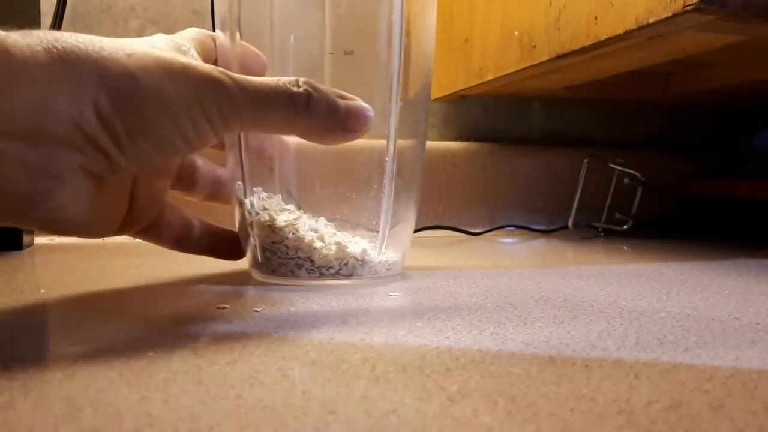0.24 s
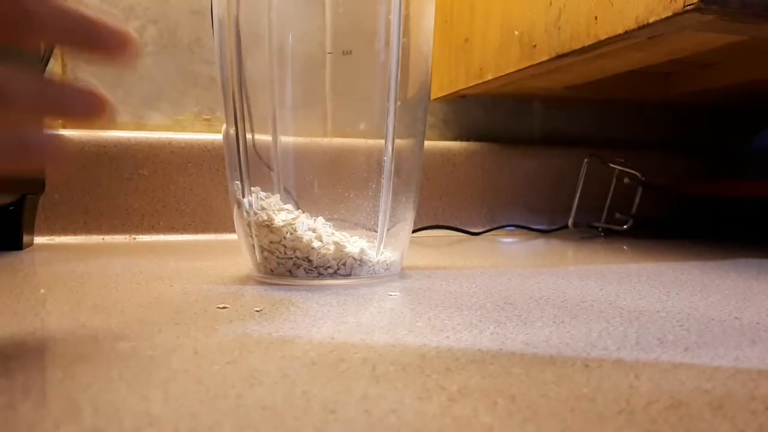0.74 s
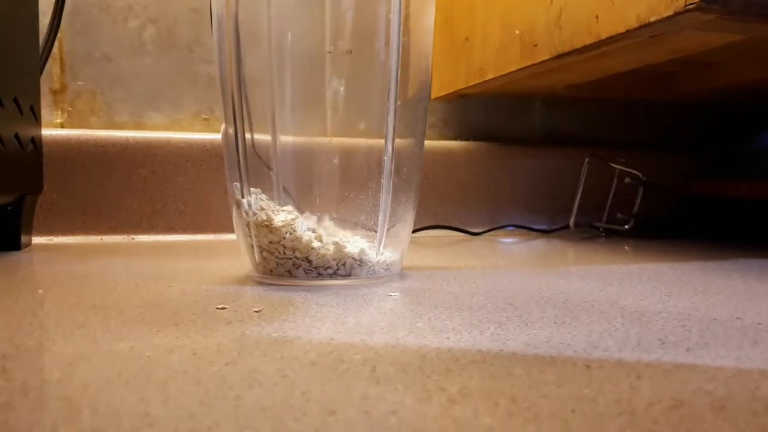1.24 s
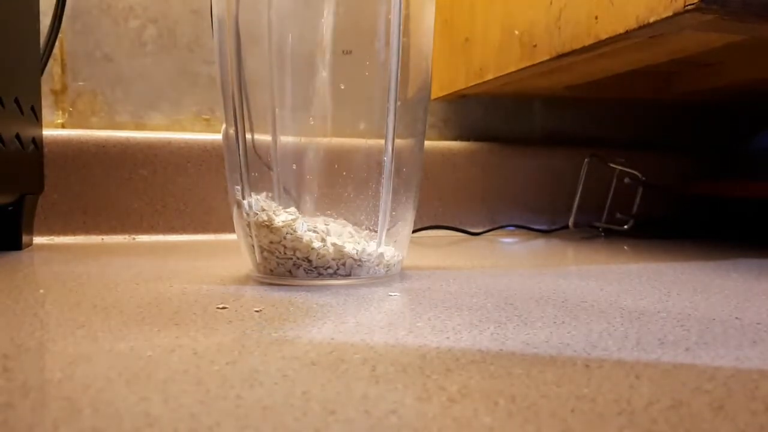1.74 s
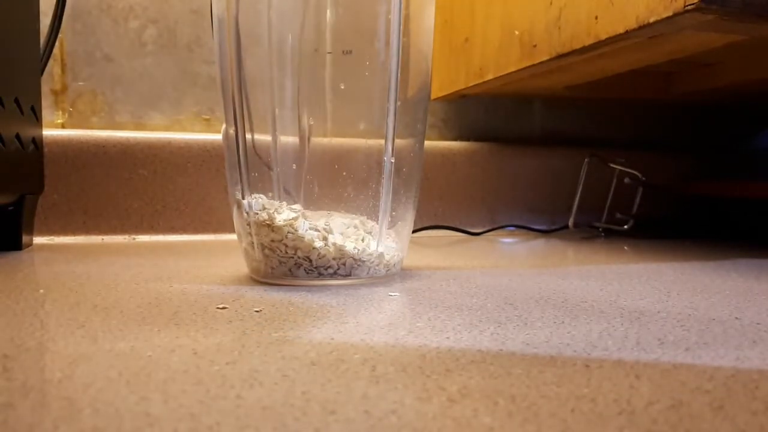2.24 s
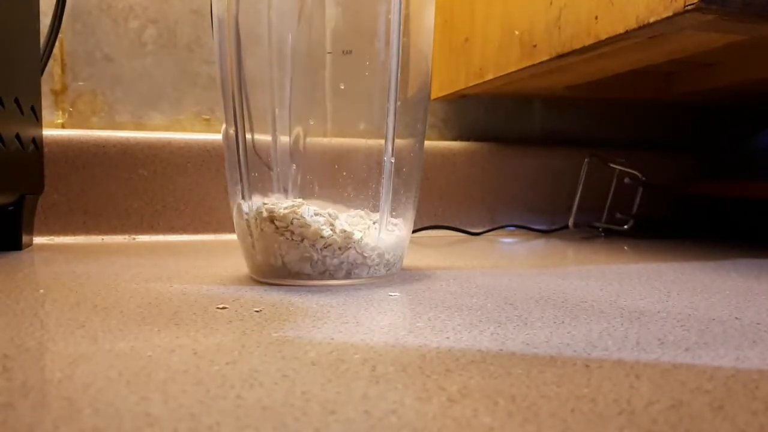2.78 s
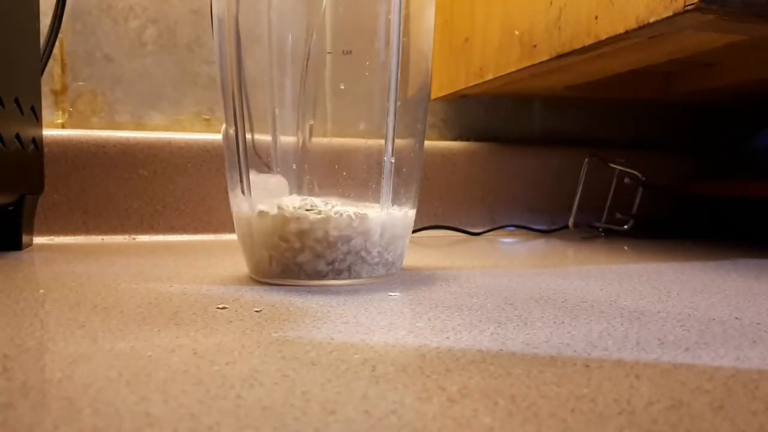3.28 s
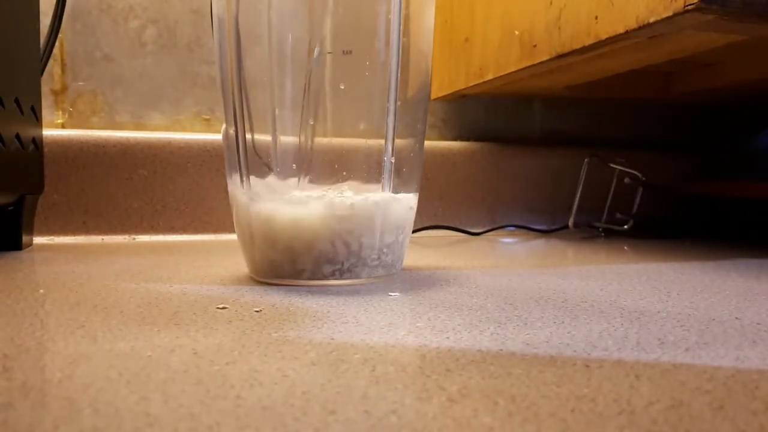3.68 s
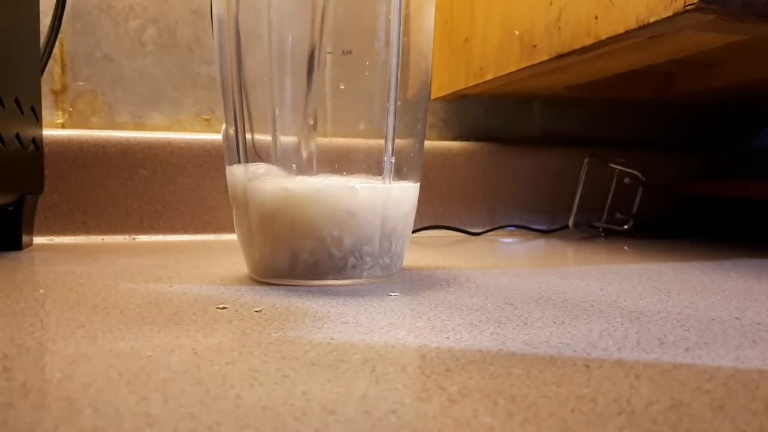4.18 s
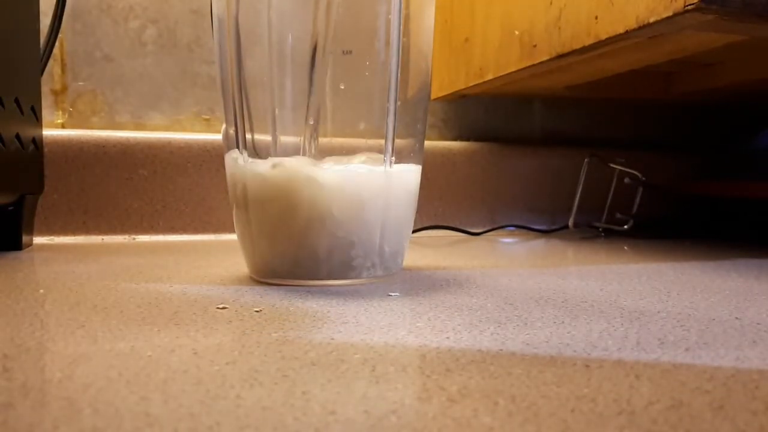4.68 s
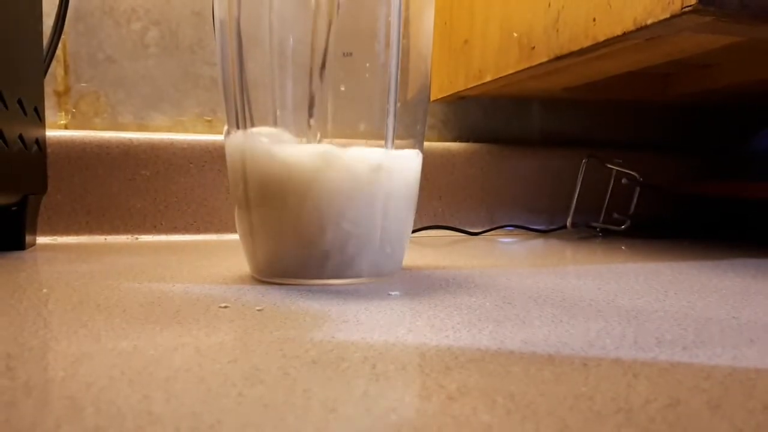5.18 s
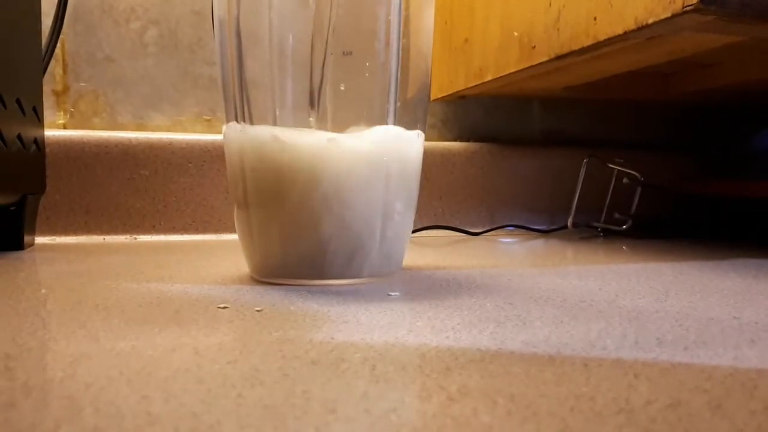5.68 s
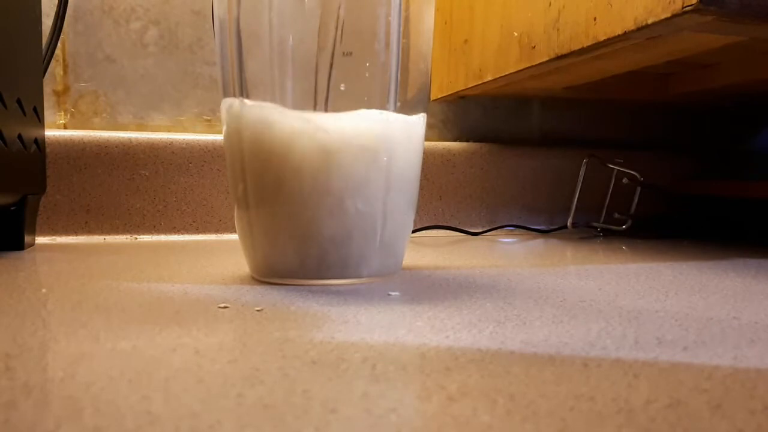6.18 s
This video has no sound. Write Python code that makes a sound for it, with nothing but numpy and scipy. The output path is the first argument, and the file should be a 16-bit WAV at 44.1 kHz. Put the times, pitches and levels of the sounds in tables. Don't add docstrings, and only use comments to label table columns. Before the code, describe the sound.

A short knock and a softer shuffle as a hand settles a plastic cup on a counter, then a quiet gap with faint refrigerator hum. Water spatters onto dry oats, quickly swelling into hollow, resonant glugs and wet slaps against the wall. The pour thins into plinks, bubbles and soft froth, its pitch rising slightly. Close stereo microphones in a quiet kitchen.

```python
import sys
import numpy as np
from scipy import signal
from scipy.fft import rfft, irfft, next_fast_len
from scipy.io import wavfile

SR = 44100
rng = np.random.default_rng(int(sys.argv[2]) if len(sys.argv) > 2 else 0)


def master_out(mix):
    frames = np.transpose(np.atleast_2d(mix))
    ceiling = np.clip(frames, -1, 1)
    pcm = np.round(ceiling * 32767).astype(np.int16)
    wavfile.write(sys.argv[1], SR, pcm)


def invert_db(level):
    return 10 ** (np.asarray(level, dtype=float) / 20)


N = 283563

# time_s, weight_db (falling mass), spatter_db (shed droplets)
STREAM = [(1.07, -66, -100), (1.11, -64, -60), (1.36, -56.5, -70), (1.5, -71, -69.5), (1.61, -50.5, -58),
          (1.7, -54, -53), (1.9, -39.5, -55.5), (2.09, -42, -53), (2.5, -43, -56), (2.85, -46, -55),
          (3.3, -46.5, -57.5), (3.6, -48.5, -59), (4.3, -52.5, -59.5), (4.53, -56, -61.5),
          (4.85, -57, -58.5), (5.05, -66, -65), (5.5, -60.5, -69), (6.43, -70, -73.5)]
# top_s, length_s, weight_db, spatter_db, counter_thump_db
GUSHES = [(1.232, 0.14, -73, -55, -47.5), (1.54, 0.032, -78, -60.5, -60), (1.72, 0.065, -54, -49, -42),
          (1.84, 0.093, -54, -50, -41), (1.955, 0.079, -34.5, -47, -36.5), (2.135, 0.048, -36, -54, -58),
          (2.254, 0.1, -28, -49.5, -39), (2.61, 0.028, -25, -48, -29.5), (2.646, 0.059, -25, -53, -42),
          (2.697, 0.16, -28.5, -75, -26.5), (2.761, 0.087, -31.5, -50, -49), (2.88, 0.015, -54, -46, -48),
          (3.05, 0.076, -41, -51, -42), (3.225, 0.082, -42, -50, -49), (3.575, 0.32, -69, -56, -47.5),
          (3.62, 0.017, -64, -78, -30.5), (3.695, 0.092, -44, -60, -39.5), (3.97, 0.067, -53, -58, -45),
          (4.461, 0.059, -63, -53.5, -42), (4.87, 0.045, -71, -68, -47), (5.5, 0.35, -76, -63.5, -77),
          (5.92, 0.2, -57, -65, -52)]
# top_s, length_s, weight_db, spatter_db, counter_thump_db
SETTLING = [
    (0.001, 0.1, -44.5, -59, -45.5),
    (0.23, 0.33, -56, -71, -51),
]
GUSH_RISE_DB, GUSH_FALL_DB = 20.5, 20.5
# mean_flow_db, weight_share [dB/dB], spatter_share [dB/dB], dry_oats_db
COUNTER_LAW = (-51, 0.4059, 0.23, -1.5)
PLOP_LAW = (-59, -0.06, 1.41, -1.5)
SPRAY_LAW = (-62, 0.32, 0.62, 19)
RUMBLE_LAW = (-60, 0.3542, -0.02, 12)
MEAN_WEIGHT_DB, MEAN_SPATTER_DB = -50, -57
COUNTER_IDLE_DB = -54
THUMP_RUMBLE_DB = -18.5
DRY_FROM_S, DRY_UNTIL_S, SOAK_S = 1.068, 1.626, 0.29
FOAM_DB, FOAM_FROM_S = -67, 1.8

# time_s, pitch_hz
COLUMN = [(0, 536), (1.7, 535), (2.7, 545.8), (3.6, 594.6), (4.4, 598), (4.9, 620), (5.5, 680), (6.43, 690)]
# centre_hz, width_hz, level_db
OVERTONES = [(662, 45, 2.5), (880, 72, -15.5), (1023, 79, -10.5), (1500, 65, -8)]
OVERTONES_DB, OVERTONES_UNTIL_S = -13, 3.1
# centre_hz, width_hz, level_db
COUNTER = [(248, 15.2, -5), (335, 51.7, -2.5), (382.7, 79.3, -3)]
# centre_hz, width_hz, level_db
CUP_FLOOR = [(76.7, 33, -5), (146.7, 23, 2.5), (218, 69, -0.5)]
# centre_hz, width_hz, level_db
CUP_WALL = [(1054, 31, -12.5), (1507, 63, 0.5), (2300, 18, -3.5), (2660, 275, 4.5), (3004, 86, 1.5),
            (3190, 110, 0.5), (3450, 94, -4.5), (3534, 88, 3), (5070, 190, -6.5), (5640, 36, 3.5),
            (11050, 170, -6.5)]
# start_s, peak_db, column_pitch_hz, counter_db, t60_s
GLUGS = [(1.748, -29, 580, -42, 0.039), (1.77, -25.5, 563, -37.5, .063), (1.795, -22, 525, -43, 0.077),
         (1.821, -12.5, 535, -48, 0.04), (1.86, -15, 550, -39, 0.051), (1.881, -7, 567, -19, 0.022),
         (1.92, -1.5, 568, -34, 0.02), (1.95, -10, 590, -38, 0.025), (1.973, -18, 547, -55, 0.04),
         (2.041, -18.5, 554, -56, 0.055), (2.124, -19.5, 598, -48, 0.045), (2.221, -19, 520, -34, 0.3),
         (2.24, -13.5, 553, -39, 0.12), (2.268, -17, 522, -53, 0.036), (2.295, -13, 540, -42, 0.052),
         (2.349, -20.5, 549, -38, 0.11), (2.536, -26, 535, -49, 0.11), (2.607, -13.5, 531.7, -29, 0.24),
         (2.696, -9, 533, -31, 0.06), (2.758, -25, 550, -25.5, 0.052), (2.875, -28, 568, -42, 0.13),
         (3.355, -36, 585, -31, 0.029), (3.611, -13.5, 567, -22.5, 0.03), (4.047, -46, 610, -44, 0.17)]
# start_s, peak_db
GULPS = [(0.036, -35), (1.238, -32.5), (1.276, -38), (1.617, -36), (1.678, -37), (1.713, -36), (1.909, -24),
         (2.008, -34), (2.104, -33), (2.136, -23), (2.331, -42), (2.415, -24.5), (2.446, -23), (2.473, -29),
         (2.81, -21.5), (2.932, -26.5), (2.99, -23), (3.049, -43), (3.084, -28), (3.118, -36),
         (3.183, -35.5), (3.395, -28), (3.529, -30), (3.66, -40), (3.714, -31), (3.939, -30.5),
         (4.352, -39), (4.382, -36), (4.472, -33), (4.712, -41), (2.186, -30), (2.64, -9), (2.722, -17),
         (3.405, -28), (3.458, -43), (3.585, -47), (2.66, -22), (2.68, -15), (1.99, -25), (2.05, -23)]
GULP_COUNTER_DB, GULP_T60_S = -25, 0.069

# centre_hz, level_db [dB per Hz]
SPATTER = [(800, 2.5), (1100, 12.5), (1600, 8.5), (2000, 8), (2700, 0.5), (4000, 7.5), (5000, -7),
           (7500, -1.5), (9400, -17.5), (11000, -9.5), (16500, -17)]
SPATTER_CENTRES_HZ = [950, 1500, 3100, 7500]
# start_s, peak_db, centre_hz
DROPS = [(1.1004, -48.5, 3360), (1.1765, -39.5, 1660), (1.2355, -32, 1680), (1.261, -36, 1610),
         (1.5933, -49.5, 5100), (1.643, -40, 1410), (1.6767, -34, 1300), (1.7106, -51, 1390),
         (1.7482, -29.5, 930), (1.7692, -36, 1040), (1.7941, -30.5, 1240), (1.858, -31.5, 1290),
         (1.9109, -34, 1010), (1.9385, -25.5, 1280), (1.995, -36.5, 2800), (2.1035, -62, 1470),
         (2.1244, -35.5, 960), (2.209, -42, 1264), (2.2451, -32, 1030), (2.3569, -38.5, 1490),
         (2.405, -46, 3450), (2.4846, -41.5, 3450), (2.529, -49, 1530), (2.603, -33, 1380),
         (2.8672, -61, 3500), (2.932, -40.5, 3170), (2.9828, -46, 2750), (3.1892, -55, 2830),
         (3.2333, -53, 2800), (3.2558, -42, 2440)]
# start_s, peak_db, centre_hz
LATE_DROPS = [(3.4045, -44, 1220), (3.433, -47, 2900), (3.617, -50, 1180), (3.999, -47.5, 1090),
              (4.29, -43, 1190), (4.432, -42.5, 1510), (4.591, -56, 2870), (4.71, -53, 3780),
              (4.8532, -60, 2300), (4.9972, -54, 3620), (5.1123, -50, 2680), (5.2102, -52, 3810),
              (5.3035, -50, 2270), (5.5938, -55, 3450), (6.0163, -54, 3160), (6.1795, -58, 3500)]
# start_s, peak_db, centre_hz
TICKS = [(1.1007, -52, 10800), (1.178, -38, 7400), (1.214, -36, 7600), (1.2596, -31.5, 10800),
         (1.3018, -52, 7050), (1.5937, -43, 6840), (1.7198, -35, 5970), (1.8395, -39, 7500),
         (1.877, -39, 7200), (1.9114, -50, 14800), (1.9398, -33, 6240), (2.2464, -34.5, 6270),
         (2.6048, -47, 6190), (2.6476, -34, 6100), (2.737, -43, 6550), (3.187, -52, 6300),
         (3.4304, -53, 7200), (3.595, -48, 7650), (4.297, -45, 12000), (4.457, -44.5, 6700)]
DROP_T60_S, TICK_T60_S = 0.061, 0.039
# start_s, peak_db, centre_hz
SLAPS = [(1.6437, -39, 5140), (1.6772, -30, 3400), (1.711, -31.5, 2780), (1.755, -38, 2330),
         (1.7714, -33.5, 2500), (1.82, -53, 4110), (1.8332, -32.5, 2720), (1.922, -41, 2870),
         (1.941, -27, 2580), (1.9744, -30.5, 2280), (1.9939, -25, 2600), (2.0144, -30.5, 2500),
         (2.0494, -37, 2820), (2.0764, -51, 2710), (2.1125, -41, 3850), (2.208, -37, 2650),
         (2.245, -46, 2720), (2.368, -40, 2790), (2.429, -36.5, 2660), (2.4867, -47, 3590),
         (2.5292, -45, 2570), (2.605, -38, 2590)]
# start_s, peak_db, centre_hz
SPITS = [(1.0799, -59, 10800), (1.94, -53, 11000), (1.9939, -47, 12500), (2.0931, -51, 12600),
         (2.142, -48, 12600), (2.2453, -47, 10900), (2.2614, -49, 10800), (2.2942, -55, 11100),
         (2.3476, -49, 12600), (2.3794, -49, 12400), (2.4329, -50, 10900), (2.4593, -65, 10900),
         (2.4813, -52, 12300), (2.5701, -61, 10760), (2.588, -49, 10800), (2.6045, -51, 10900),
         (2.6294, -48, 12600), (2.6494, -56, 12600), (2.7048, -61, 9800), (2.73, -55, 12700),
         (2.7694, -48, 10100), (2.8094, -47, 10600), (3.8994, -61, 12800), (4.0594, -59, 12800)]
# start_s, peak_db, centre_hz
FLICKS = [(1.842, -39, 12500), (2.943, -49, 12700), (3.19, -46, 13500), (3.54, -47, 12300),
          (3.7, -50, 11200)]
# start_s, peak_db, pitch_hz
PINGS = [(2.657, -30, 3660), (2.876, -60, 2780), (2.988, -52, 2940), (3.05, -50.5, 3540),
         (3.232, -43, 2800), (3.662, -45, 3420), (5.88, -51, 4300)]
# start_s, peak_db, pitch_hz
PLINKS = [(1.178, -50, 1500), (1.237, -40, 1500), (1.259, -37.5, 1430), (1.263, -38, 1950),
          (1.276, -39, 1500), (1.3, -45, 1500), (1.312, -51, 1590), (1.677, -42, 1480), (1.69, -44, 1150),
          (1.712, -39, 990), (1.769, -40, 930), (1.797, -34, 880), (1.832, -41, 1480), (1.975, -41, 1260),
          (1.946, -29, 2750), (2.808, -48, 3450), (2.868, -45, 3600), (2.878, -38, 2690),
          (2.892, -49, 3670), (2.93, -38, 3450), (2.935, -40, 2730), (2.984, -37, 2910), (2.992, -35, 2890),
          (3.036, -48, 2630), (3.053, -42, 3580), (3.055, -47, 2890), (3.075, -50, 2700),
          (3.115, -49, 3480), (3.145, -47, 3700), (3.192, -48, 2780), (3.212, -47, 2770),
          (3.233, -37.5, 2800), (3.255, -46, 2420), (1.13, -57, 1500), (1.153, -54, 1500),
          (1.197, -53, 1480), (1.222, -40, 2640), (1.245, -44, 2020), (1.286, -47, 1440),
          (2.596, -34, 1055), (2.606, -37, 1550), (2.617, -33, 1000), (2.66, -42, 1470),
          (2.74, -36.5, 1500), (3.352, -49, 1140), (3.43, -45, 1200), (3.538, -50, 1280),
          (3.612, -42, 1036), (3.619, -38.5, 1250), (3.706, -48, 1080)]
PLINK_T60_S, PLINK_SWELL_S, PLINK_RISE = 0.037, 0.0021, 0.03
PLINK_LEAN_DB = 4
FLECKS_PER_S, FLECK_DB, FLECK_CYCLES = 90, -14.5, 98
FLECK_LOW_HZ, FLECK_HIGH_HZ = 2300, 4300
# top_s, length_s, level_db
WHISTLE = [(4.25, .1, -65), (4.4, 0.2, -67), (4.64, 0.1, -64), (4.74, 0.099, -60), (4.87, .08, -61),
           (5.13, .08, -64), (5.3, 0.26, -62), (5.43, .06, -68.5), (5.62, .15, -72), (5.82, .15, -70.5),
           (5.92, .08, -74)]
# centre_hz, width_hz, level_db
WHISTLE_RING = [(2300, 40, 0)]
COLUMN_HUM_DB, COLUMN_HUM_FROM_S, COLUMN_HUM_WIDTH_HZ = -62.5, 5.06, 68

# centre_hz, width_hz, depth [0-1]
DIPS = [(427, 162, 0.76)]
# centre_hz, width_hz, depth [0-1]
DIPS_UPPER = [(775, 90, .85)]
# centre_hz, likeness [0-1]
LIKENESS = [(60, 0.87), (640, 0.29), (1400, 0.35), (3100, 0.13), (7000, 0.056), (15000, 0.11)]
# centre_hz, level_db
LEFT_OVER_RIGHT = [(60, 1.5), (110, 2), (200, -1), (380, 3), (540, 1), (700, 1.5), (1290, -3.5),
                   (2380, 0.5), (4400, 4.5), (8120, 1.5), (15000, 5)]
RIGHT_LAG_SAMPLES = 6

# centre_hz, level_db
ROOM = [(24, -43), (40, 0), (65, 3.5), (157, 0.5), (215, -2), (294, -52.5), (357, -4), (386, 5.5),
        (790, -5.5), (900, -29), (1170, -74), (1980, -120)]
# centre_hz, level_db
HISS = [(530, -49), (900, -24), (1150, -11), (1400, -14), (1920, -6), (2070, 4), (5160, -9), (16000, -32)]
ROOM_DB, HISS_DB, CAPSULE_HISS_DB = -60, -78.5, -77
# centre_hz, likeness [0-1]
ROOM_LIKENESS = [(60, 1), (400, 0.04), (1400, 0.078), (4000, 0.05), (15000, 0.02)]
# pitch_hz, rms_db
HUM = [(59.3, -65)]
CUTOFF_HZ = 15820


def rms_one(x):
    return x / np.sqrt(np.mean(x ** 2) + 1e-20)


def in_time(rows):
    s, *columns = np.transpose(rows)
    return [np.interp(np.arange(N) / SR, s, column) for column in columns]


def at_hz(points, hz):
    table_hz, values = np.transpose(points)
    return np.interp(np.log(hz), np.log(table_hz), values)


def power_sum(levels_db):
    return 20 * np.log10(np.sqrt(np.sum(invert_db(np.array(levels_db)) ** 2, axis=0)))


def drift(rate_hz):
    r = np.exp(-80 * np.pi * rate_hz / SR)
    noise = rng.standard_normal(N // 40 + 2002)
    slow = signal.lfilter([1], [1, -2 * r, r * r], noise)[2000:]
    return np.interp(np.arange(N) / 40, np.arange(len(slow)), rms_one(slow))


def grains(per_s, spread_db):
    sizes_db = spread_db * np.minimum(rng.exponential(1, (2, N)), 5)
    sizes = invert_db(sizes_db) * rng.choice([-1, 1], (2, N))
    return sizes * (rng.random((2, N)) < per_s / SR) + 1e-18


def resonances(x, modes):
    out = 0
    for k, (hz, width_hz, level_db) in enumerate(modes):
        r = np.exp(-np.pi * width_hz / SR)
        zeros = [(1 - r * r) / 2, 0, -(1 - r * r) / 2]
        poles = [1, -2 * r * np.cos(2 * np.pi * hz / SR), r * r]
        out = out + (-1) ** k * invert_db(level_db) * signal.lfilter(zeros, poles, x)
    return out


def moving_resonance(x, hz, width_hz):
    out, state = np.zeros(N), np.zeros(2)
    r = np.exp(-np.pi * width_hz / SR)
    for i in range(0, N, 256):
        poles = [1, -2 * r * np.cos(2 * np.pi * hz[i] / SR), r * r]
        out[i:i + 256], state = signal.lfilter([1 - r, 0, r - 1], poles, x[i:i + 256], zi=state)
    return out


def stereo_bands(pair, spectrum, likeness, patchy_db, moving_db):
    low_hz, high_hz = spectrum[0][0], spectrum[-1][0]
    edges_hz = low_hz * 2 ** np.arange(0, np.log2(high_hz / low_hz) + 1 / 3, 1 / 3)
    out = 0
    for low, high in zip(edges_hz, edges_hz[1:]):
        hz = np.sqrt(low * high)
        band = signal.butter(2, [low, high], "band", fs=SR, output="sos")
        mid, side = signal.sosfilt(band, pair)
        alike = np.clip(at_hz(likeness, hz), 0, 1)
        gain = invert_db(at_hz(spectrum, hz) + patchy_db * drift(18.0) + moving_db(hz))
        stereo = np.sqrt(1 + alike) * mid + np.sqrt(1 - alike) * side * [[1], [-1]]
        out = -out + gain * stereo
    return out


def add(out, s, sound):
    i = round(s * SR)
    out[..., i:i + sound.shape[-1]] += sound[..., :N - i]


def swells(rows):
    top_s, length_s, *tops_db = np.transpose(rows)[..., None]
    coarse = np.arange(0, N + 32, 32)
    late = (coarse / SR - top_s) / length_s
    shape_db = np.maximum(np.minimum(GUSH_RISE_DB * late, -GUSH_FALL_DB * late), -150)
    return [np.interp(np.arange(N), coarse, power_sum(top_db + shape_db)) for top_db in tops_db]


def flow():
    stream_weight_db, stream_spatter_db = in_time(STREAM)
    gush_weight_db, gush_spatter_db, gush_thump_db = swells(GUSHES)
    settle_weight_db, settle_spatter_db, settle_thump_db = swells(SETTLING)
    weight_db = power_sum([stream_weight_db, gush_weight_db, settle_weight_db])
    shed_db = power_sum([stream_spatter_db, gush_spatter_db])
    spatter_db = power_sum([shed_db, settle_spatter_db])
    t = np.arange(N) / SR
    dry_oats = np.clip((t - DRY_FROM_S) / 0.05, 0, 1) * np.exp(-np.maximum(t - DRY_UNTIL_S, 0) / SOAK_S)

    def follow(law, droplets_db):
        return np.dot(law, [np.ones(N), weight_db - MEAN_WEIGHT_DB, droplets_db - MEAN_SPATTER_DB, dry_oats])

    idle_db = np.full(N, COUNTER_IDLE_DB)
    counter_db = power_sum([follow(COUNTER_LAW, shed_db), gush_thump_db, settle_thump_db, idle_db])
    foam_db = FOAM_DB - 40 * np.clip(FOAM_FROM_S - t, 0, 1)
    spray_db = power_sum([follow(SPRAY_LAW, shed_db), foam_db])
    rumble_db = power_sum([follow(RUMBLE_LAW, shed_db), gush_thump_db + THUMP_RUMBLE_DB])
    plop_db = follow(PLOP_LAW, spatter_db)
    return weight_db, counter_db, rumble_db, plop_db, spatter_db, spray_db


def slosh(column_db, counter_db, rumble_db):
    push = signal.lfilter([1], [1, -0.9], grains(1500 * invert_db(1.5 * drift(20)), 2.23))
    hz, = in_time(COLUMN)
    column = moving_resonance(moving_resonance(push[0], hz, 29.2), hz * 0.67, 350.0)
    counter = resonances(push[1] + 0.69 * push[0], COUNTER)
    floor = invert_db(rumble_db) * rms_one(resonances(push[1], CUP_FLOOR))
    muffled_db = -30 * np.clip(np.arange(N) / SR - OVERTONES_UNTIL_S, 0, 1)
    upper = rms_one(resonances(np.diff(push[1], prepend=0), OVERTONES))
    air = rms_one(column) + invert_db(OVERTONES_DB + muffled_db) * upper
    return invert_db(column_db) * air + invert_db(counter_db - 1.5) * rms_one(counter) + floor


def glugs():
    out, t = np.zeros(N), np.arange(round(0.1 * SR)) / SR
    further = []
    for s, peak_db in GULPS:
        further.append((s, peak_db, np.interp(s, *np.transpose(COLUMN)), peak_db + GULP_COUNTER_DB, GULP_T60_S))
    lumps = list(GLUGS) + further
    phases = rng.uniform(0, 2 * np.pi, size=(len(lumps), 3))
    for (s, peak_db, hz, counter_db, t60_s), phase in zip(lumps, phases):
        swell = (1 - np.exp(-(t / 0.0029) ** 2)) * invert_db(-60 * t / max(t60_s, 0.01))
        column = np.sin(2 * np.pi * hz * t + phase[0])
        column = column + 0.2 * np.sin(2 * np.pi * 1.22 * hz * t + phase[2])
        counter = invert_db(counter_db + 3.0) * np.sin(2 * np.pi * COUNTER[1][0] * t + phase[1])
        add(out, s - 0.0015, swell * (invert_db(peak_db) * column + counter))
    return out


def spatter(*levels_db):
    clumps_db = 1.1 * drift(30) + 0.5 * drift(8)
    drops = rms_one(grains(3000 * invert_db(clumps_db), 3.4)) + 0.92 * rng.standard_normal((2, N))

    def moving_db(hz):
        log_centres = np.log(SPATTER_CENTRES_HZ)
        shares = [np.interp(np.log(hz), log_centres, one) for one in np.eye(len(levels_db))]
        return clumps_db * (1 + hz / 12000) + np.dot(shares, levels_db)

    return stereo_bands(drops, SPATTER, LIKENESS, 2.0, moving_db)


def splashes(rows, breadth, swell_s, t60_s):
    out, t = np.zeros((2, N)), np.arange(round(0.06 * SR)) / SR
    top_hz = 0.45 * SR
    for (s, peak_db, hz), noise in zip(rows, rng.standard_normal((len(rows), 2, len(t)))):
        core = signal.butter(2, [hz / breadth, min(hz * breadth, top_hz)], "band", fs=SR)
        crackle = signal.butter(1, [hz * 1.15, min(hz * 1.58, top_hz)], "band", fs=SR)
        burst = rms_one(signal.lfilter(*core, noise)) + 0.68 * rms_one(signal.lfilter(*crackle, noise))
        envelope = (1 - np.exp(-t / swell_s)) * invert_db(peak_db - 3.5 - 60 * t / max(t60_s, 0.003))
        mid, side = burst * envelope
        add(out, s, mid + 0.5 * side * np.array([[1], [-1]]))
    return out


def plinks():
    out, t = np.zeros(N), np.arange(round(0.05 * SR)) / SR
    age = t / PLINK_T60_S
    for s, peak_db, hz in PLINKS:
        swell = (1 - np.exp(-t / PLINK_SWELL_S)) * invert_db(peak_db + 6.0 - 60 * age)
        add(out, s, swell * np.sin(2 * np.pi * hz * t * (1 + PLINK_RISE * age)))
    return out


def flecks(spatter_db):
    clicks = grains(FLECKS_PER_S, 7.0)[0]
    dealt = rng.integers(0, 10, size=N)
    out = 0
    for k, hz in enumerate(np.geomspace(FLECK_LOW_HZ, FLECK_HIGH_HZ, num=10)):
        ring = resonances(clicks * (dealt == k) + 1e-18, [(hz, 0.98 * hz / FLECK_CYCLES, 0)])
        out = out + rms_one(resonances(ring, [(hz, hz / 6, 0)]))
    return invert_db(spatter_db + FLECK_DB) * rms_one(out)


def wall_whistle():
    whistle_db, = swells(WHISTLE)
    ring = resonances(resonances(rng.standard_normal(N), WHISTLE_RING), WHISTLE_RING)
    return invert_db(whistle_db - 0.5) * rms_one(ring)


def column_hum():
    hz, = in_time(COLUMN)
    air = moving_resonance(rng.standard_normal(N), hz, COLUMN_HUM_WIDTH_HZ)
    air = moving_resonance(air, hz, 200.0)
    fade_db = -20 * np.clip(COLUMN_HUM_FROM_S + 0.5 - np.arange(N) / SR, 0, 1)
    return invert_db(COLUMN_HUM_DB + fade_db) * rms_one(air)


def kitchen(x):
    out = np.zeros((2, N))
    for k, lag_s in enumerate(rng.uniform(0.003, 0.044, 24)):
        add(out[k % 2], lag_s, x * invert_db(-200 * lag_s) * (-1) ** (k // 2))
    return signal.lfilter([0.5], [1, -0.5], out)


def near_left(x):
    size = next_fast_len(N)
    hz = np.maximum(np.fft.rfftfreq(size, 1 / SR), 1)
    lean = invert_db(at_hz(LEFT_OVER_RIGHT, hz) / 2)
    late = np.exp(-2j * np.pi * hz * RIGHT_LAG_SAMPLES / SR)
    return irfft(rfft(x, size) * [lean, late / lean], size)[:, :N]


def room():
    white, t = rng.standard_normal((2, N)), np.arange(N) / SR
    tone = invert_db(ROOM_DB) * rms_one(stereo_bands(white, ROOM[:-1], ROOM_LIKENESS, 0.37, lambda hz: 0))
    hiss = invert_db(HISS_DB) * rms_one(stereo_bands(white, HISS[1:], ROOM_LIKENESS, 0.23, lambda hz: 0))
    hum = 0
    for hz, rms_db in HUM:
        hum = hum + np.sqrt(2) * invert_db(rms_db + 1.5 * drift(4)) * np.sin(2 * np.pi * hz * t)
    return tone + hiss + hum


def scene():
    column_db, counter_db, rumble_db, *droplets_db = flow()
    body = slosh(column_db, counter_db, rumble_db) + glugs()

    wet = spatter(counter_db - 14.5, *droplets_db)
    wet = wet + splashes(list(DROPS) + list(LATE_DROPS), 1.2, 0.00019, DROP_T60_S)
    wet = wet + splashes(TICKS, 1.1, 0.00096, TICK_T60_S)
    wet = 0.59 * wet + 1.347 * resonances(wet, CUP_WALL) + wall_whistle()
    cup = body + wet + invert_db(-15.5) * kitchen(body + wet[0])

    cup = cup + flecks(droplets_db[1])
    cup = cup + splashes(PINGS, 1.04, 0.006, 0.047) + splashes(FLICKS, 1.34, 0.00085, 0.021)
    slaps = splashes(SLAPS, 1.5, 0.00027, 0.036)
    cup = cup + 0.48 * slaps + 0.92 * resonances(slaps, CUP_WALL)
    cup = cup + splashes(SPITS, 1.45, 0.00087, 0.02)
    cup = cup + plinks() * invert_db(PLINK_LEAN_DB * np.array([[0.5], [-1]]))

    cancelled = 0
    for hz, width_hz, depth in list(DIPS) + list(DIPS_UPPER):
        cancelled = cancelled + np.clip(depth, 0, 1) * resonances(cup, [(hz, width_hz, 0)])
    return near_left(cup - cancelled + column_hum()) + room()


def roll_off(x):
    return signal.sosfilt(signal.butter(12, 16150, fs=SR, output="sos"), x)


def record(dry):
    heard = dry + invert_db(CAPSULE_HISS_DB) * rng.standard_normal(dry.shape)
    top_cut = signal.ellip(12, 0.5, 60, CUTOFF_HZ, fs=SR, output="sos")
    return roll_off(signal.sosfilt(top_cut, heard))


dry = scene()
out = record(dry)
master_out(out)
```